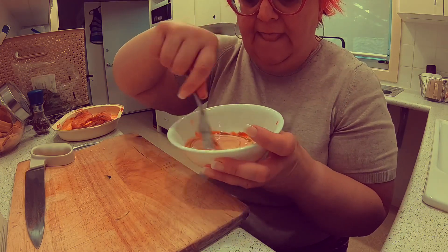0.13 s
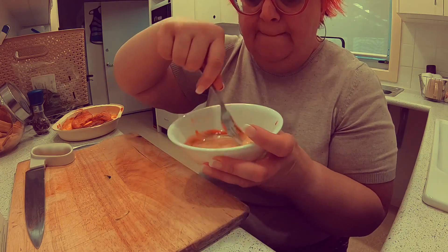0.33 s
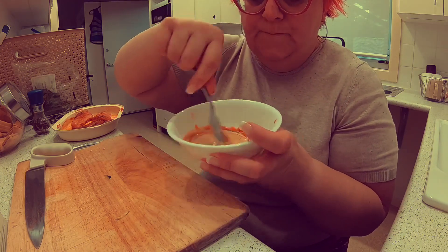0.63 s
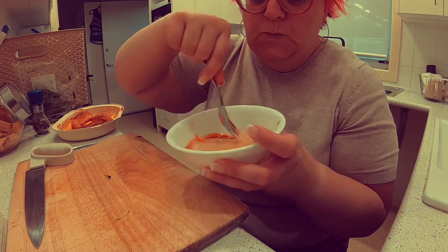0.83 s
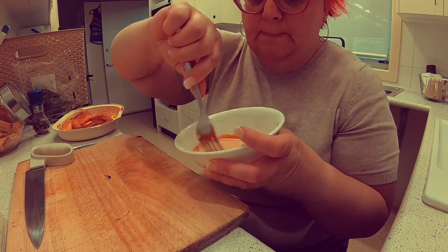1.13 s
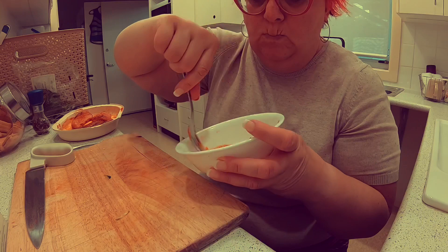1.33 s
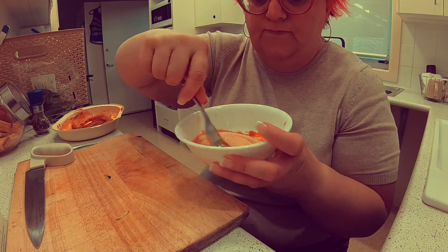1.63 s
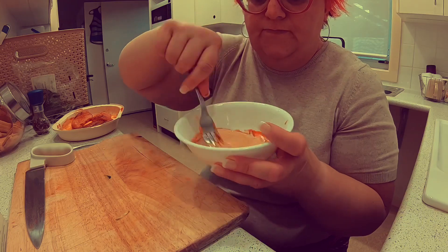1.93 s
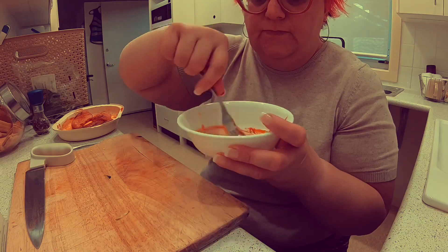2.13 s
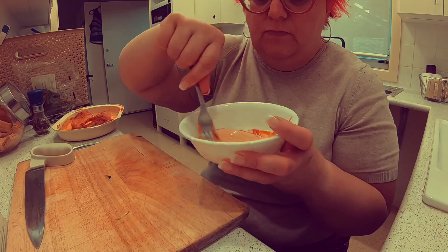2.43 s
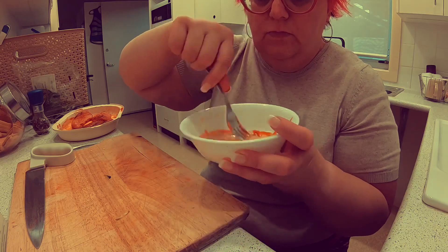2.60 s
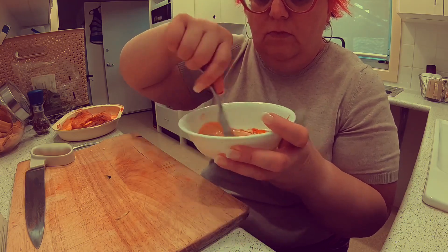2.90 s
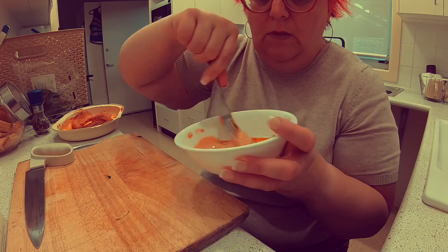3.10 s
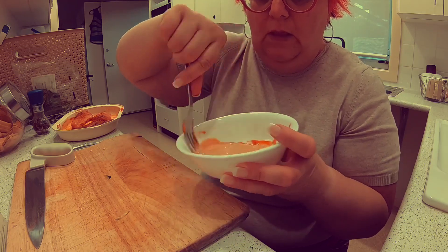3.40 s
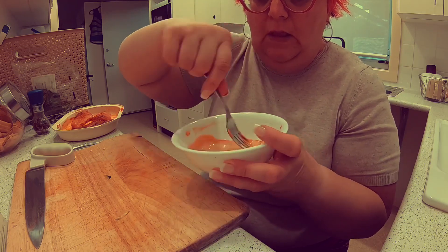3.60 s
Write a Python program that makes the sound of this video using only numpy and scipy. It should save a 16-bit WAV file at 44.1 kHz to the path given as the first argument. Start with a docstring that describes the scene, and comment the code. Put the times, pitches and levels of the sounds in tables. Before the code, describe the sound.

A metal fork stirs thick sauce in a ceramic bowl, opening with quick clinks and gritty squeaks, then sparser hard taps between short scrapes and soft squelches; close microphone, small kitchen, faint low hum.

```python
"""Stirring thick sauce in a ceramic bowl

A metal fork clinks on a hand-held bowl in a small kitchen: damped modes plus a crack of noise.
Its tines squeak by stick-slip over the glaze, and light rubbing runs on as filtered random grains.
The sauce squelches: random pops ring its hollows and rising sine blips gurgle.
Ceramic resonances and brief room reverberation follow the contacts, over a low hum of shaped noise."""
import sys
import numpy as np
from scipy import signal
from scipy.fft import rfft, irfft
from scipy.io import wavfile
from scipy.ndimage import uniform_filter1d, minimum_filter1d

SR = 44100
rng = np.random.default_rng(int(sys.argv[2]) if len(sys.argv) > 2 else 0)


def master_out(mix):
    """Clip the mix to full scale and print it as 16-bit PCM to the path in sys.argv[1]."""
    frames = np.transpose(np.atleast_2d(mix))
    ceiling = np.clip(frames, -1, 1)
    pcm = np.round(ceiling * 32767).astype(np.int16)
    wavfile.write(sys.argv[1], SR, pcm)


N = 165375

# Steady background: f/Hz, spectral level/dB per Hz (relative)
HUM_SPECTRUM = [(25, -11), (48, -3.5), (90, -10), (160, 4), (235, 1), (350, -10.5), (700, -10.5),
                (1300, -15.5), (3000, -23), (8000, -27), (15000, -46)]
HUM_DB, HUM_SIDE_DB = -51.5, -24.5   # side relative to mid

# Light continuous rubbing, pressure of the fork on the bottom: t/s, level/dB
DRAG_PRESSURE = [(0, -46), (.4, -52), (.9, -50), (1.121, -61), (1.21, -58), (1.3, -56), (1.42, -51),
                 (1.78, -55), (2.35, -55), (2.75, -52), (3.199, -48), (3.45, -59), (3.7, -47)]
# Colour of the rubbing: f/Hz, spectral level/dB per Hz (relative)
DRAG_SPECTRUM = [(300, -2), (1000, -4), (1900, 14), (2700, -19), (4200, 11.5), (7000, -2), (9000, -40),
                 (15000, -12.5)]
DRAG_SWING_DB, DRAG_SWING_HZ = 4, 4.8   # spread and bandwidth of the overall wavering
DRAG_BANDS_HZ = [200, 1400, 2300, 3600, 4500, 5600, 7600, 16000]
DRAG_FLICKER_DB, DRAG_FLICKER_HZ = 1, 10.8   # the same for each band on its own

# Tines dragging over the glaze: t/s, length/s, squeak level/dB, grit level/dB, f/Hz of the lowest
# tone, extra treble level/dB; a negative t starts at zero
SCRAPE_EVENTS = [(-.01, 0.048, -49, -35.5, 1696, -7), (0.162, 0.0093, -28, -29, 1720, 4),
                 (0.296, 0.011, -45, -61, 1910, 0), (0.35, 0.015, -43.5, -67, 1795, -1),
                 (0.41, 0.024, -34, -36.5, 1605, -39), (0.426, 0.019, -24, -19, 1684, 2.5),
                 (0.452, 0.035, -37, -32.5, 1665, -9), (0.673, 0.018, -23, -15.5, 1610, 7),
                 (0.682, 0.015, -27, -14.5, 1575, 4), (0.708, 0.024, -29, -21.5, 1554, -2),
                 (0.744, 0.027, -52, -36, 1610, -12), (0.969, 0.02, -52, -33, 1683, 14),
                 (1.452, 0.036, -36, -25, 1646, 0.5), (1.489, 0.02, -24, -27, 1651, -5.5),
                 (1.638, 0.017, -44, -43, 1690, 3), (1.809, 0.032, -74, -43, 1723, 3),
                 (1.905, 0.021, -29, -27, 1710, 3), (1.927, 0.024, -21, -21, 1720, 2.5),
                 (1.976, 0.062, -41.5, -37, 1687, -19), (2.189, 0.0038, -33, -29.5, 1700, -28),
                 (2.213, 0.008, -33, -36, 1751, 2), (2.435, 0.018, -19.5, -35, 1732, -2),
                 (2.451, 0.015, -17.5, -22, 1735, 4), (2.331, 0.021, -57.5, -45.5, 1680, 7),
                 (2.579, 0.026, -67, -41, 1653, -4), (2.701, 0.0073, -36.5, -51, 1818, 4.5),
                 (2.95, 0.013, -21, -19.5, 1723, 7), (2.991, 0.034, -37, -43.5, 1697, -11),
                 (3.262, 0.026, -33.5, -47, 1543, -29), (3.294, 0.007, -24, -21.5, 1651, -4),
                 (3.31, 0.032, -36, -38.5, 1636, -15), (3.673, 0.0016, -35.5, -57, 1720, -12),
                 (3.69, 0.0078, -37, -42.5, 1720, 5), (3.74, .02, -39, -46, 1720, 17)]
# Second to ninth partials of the stick-slip tone: level/dB against the lowest tone, before judder
OVERTONE_LEVELS = [-13, -6.5, -2.5, -13, -24.5, -13.5, -1, -5.5]
# Resonances stirred by rubbing: f/Hz at the rest pitch, width/Hz of one pass, level/dB per Hz of width
RUB_RESONANCES = [(1450, 50, -29), (1720, 140, 3), (1907, 43, 5.5), (3260, 380, -14), (4470, 2200, -13),
                  (4985, 356, 4), (5920, 1020, -6.5), (6374, 296, 7.5), (6570, 62, 6), (7300, 800, -33),
                  (9730, 740, -17), (12550, 210, -2.5), (14000, 930, -12), (16300, 406, -6.5)]
SCRAPE_ATTACK_S, SCRAPE_RELEASE_S, GRAINS_PER_S = 0.0039, 0.0077, 3500
PITCH_WOBBLE, WOBBLE_HZ, JUDDER_DB = 0.0094, 245, 2.5   # wobble: share of the pitch
OVERTONE_TUNE = 0.98   # partials above the second lie slightly flat
PING_FOLLOWS = 0.54   # the cleaner the squeak, the stronger its octave (dB per dB of squeak over grit)
SWELL_SHARE = 0.4   # share of a scrape over which overtones and grit build up
GRIT_REST_HZ, GRIT_FOLLOWS = 1667.5, 0.58   # rubbed resonances rise with the tine pitch (exponent)

# Impacts of fork on bowl: t/s, level/dB, extra bass/dB, extra ting/dB, extra clank/dB, extra treble/dB
CLINK_EVENTS = [(0.0501, -11, 2.5, 7.5, 8.5, -4.5), (.168, -17.5, -8, -11, 0.5, -4.5),
                (.401, -38, 14.5, -6, 0, -6), (.432, -18, 2.5, 1, -14, 4),
                (0.5911, -5.5, 0.5, 0.5, 2, -4.5), (.596, -8, -6.5, 9, 1, -7.5), (.697, -14, -4.5, 3, 9, 6),
                (.909, -33.5, 7.5, -6, -2, -9), (0.977, -21.5, 6, 16.5, -12, 2.5),
                (1.13, -48, 12, 10, 4, 9), (1.467, -26.5, 0.5, 16, -4, 2), (1.502, -27, 2, 10, 2, 5),
                (1.647, -38, 18, 10, -2, -5), (1.707, -36.5, 8, -12, 5, 3), (1.84, -31, 3.5, 0, -5, -6),
                (1.912, -27, -14, 8, -2, -1), (2.072, -13.5, -1, 12, 15, -9),
                (2.076, -2.5, -3, -2, 7.5, -3), (2.116, -21, -5, 3, 7, -10), (2.378, -42, 7, 1, 4, 4),
                (2.8189, -2.5, -4.5, -1.5, 6, -1.5), (2.8232, -10.5, 1, -5, -9, -2),
                (3.079, -14.5, -3, 4.5, -1, -12), (3.0912, -9, -1, 0.5, 8.5, -5),
                (3.3, -22.5, 6.5, 13.5, -14, -1), (3.494, -18, -2.5, -10, -2.5, -6.5),
                (3.631, -41, 27.5, 11, -17, -4), (3.709, -30, 10, -2, -19, -7),
                (3.737, -29.5, 2.5, 0, -2, 4.5)]
# Modes of fork and bowl: f/Hz, level/dB (relative), t60/s
RING_MODES = [(1938, -12, 0.072), (2227, -16.5, 0.023), (3310, -10, 0.023), (4890, -16, 0.02),
              (4985, -9, 0.051), (5150, -2.5, 0.025), (5480, -10, 0.022), (5710, 0, 0.027),
              (6380, -6, 0.024), (6580, -9, 0.013), (6810, -7.5, 0.016), (9530, -11.5, 0.014),
              (12014, -1.5, 0.015), (13900, -18, 0.015), (15300, -15, 0.014)]
# Noise of first contact: f/Hz, spectral level/dB per Hz (relative)
CRACK_SPECTRUM = [(40, -60), (150, -42.5), (550, -10.5), (1100, -14.5), (2100, -1), (2800, -9.5),
                  (3300, -6.5), (3750, -12), (4650, 0.5), (5600, -1), (7000, -2.5), (8400, -21),
                  (11000, -39), (12100, -0.5), (12900, -8.5), (15500, -14)]
CRACK_DB, CRACK_T60_S, RING_DB, MODE_SPREAD_DB, CLINK_ATTACK_S = 0.5, 0.036, -3.5, 1, 0.0015
# The place of contact favours one group of modes or the other; widths as shares of the pitch
TING_HZ, TING_WIDTH, CLANK_HZ, CLANK_WIDTH = 4873, 0.082, 6720, 0.098
CHATTER_PER_S, CHATTER_DECAY_S, CHATTER_DB = 580, 0.008, -11.5   # tines rebounding after a hit

# Lingering ceramic resonances: f/Hz, width/Hz, level/dB
BOWL_RESONANCES = [(1056, 12, -0.5), (1460, 4, -9), (1760, 5.9, -6), (1916, 45, -1), (4960, 42, -5),
                   (5970, 22, -2), (6470, 11, -19.5), (6470, 18, 8)]

# Pushes through the sauce: t/s, length/s, level/dB, extra low plop/dB, extra wet smack/dB
SQUELCH_EVENTS = [(0.056, 0.052, -44.5, -19, 0), (0.095, 0.041, -37, 12, -6), (0.162, 0.052, -49.5, 0, 24),
                  (0.336, 0.031, -42.5, -10, -1), (0.393, 0.012, -31.5, 6, -12),
                  (0.432, 0.039, -49.5, 13, 12), (0.614, 0.054, -40, 11, 12), (0.675, 0.047, -40.5, -1, 24),
                  (0.88, 0.016, -36.5, -4, 1), (0.907, 0.025, -34, 0, -2), (0.974, 0.042, -35.5, 2, 4),
                  (1.494, 0.024, -39.5, 13, 1), (1.52, 0.021, -34.5, 5, 2), (1.636, 0.035, -39.5, 9, 9),
                  (1.921, 0.035, -50, 12, 11), (2.081, 0.01, -39, -1, -18), (2.108, 0.068, -43, -4, 7.5),
                  (2.379, 0.023, -46, -9, 9), (2.82, 0.063, -46.5, -12, -3), (3.091, 0.02, -38, 14, -11),
                  (3.167, 0.038, -42, 3, -13), (3.2, 0.02, -35.5, 17, -8), (3.301, 0.022, -42, 5, 1),
                  (3.547, 0.11, -49, -4, 0), (3.625, 0.013, -29.5, -1, -6), (3.655, 0.036, -44, 23, -3)]
# Hollows in sauce and bowl: f/Hz, width/Hz, level/dB per Hz of width (relative)
HOLLOW_RESONANCES = [(100.5, 86, -13.5), (158.3, 41, -2.5), (232.7, 19.7, 5), (500, 45, -1),
                     (635.3, 26.6, 6), (803.7, 14.6, 6), (895, 71, -6.5), (1061.4, 20, 4), (1390, 210, -31),
                     (3020, 1490, -18)]
PLOP_BELOW_HZ, SMACK_ABOVE_HZ, SAUCE_DULL_HZ = 320, 860, 3800
POPS_PER_S, POPS_FADE = 420, 1.8   # fade: decay time in stroke lengths
HOLLOW_DB, BUBBLE_DB = 3, -7   # balance within one squelch
BUBBLE_LOW_HZ, BUBBLE_HIGH_HZ, BUBBLES_PER_S = 453.4, 1570, 220
BUBBLE_CYCLES, BUBBLE_RISE = 3.8, .05   # cycles of starting pitch, and share of it gained, per decay time

# Reverberation time: f/Hz, t60/s
ROOM_DECAY = [(150, 0.064), (700, 0.22), (1800, 0.33), (5500, 0.33), (13000, 0.34)]
# Reverberant level: f/Hz, level/dB against the direct sound
ROOM_LEVEL = [(150, -9), (700, -5.5), (1800, -6.5), (5500, -5.5), (13000, -5)]
ROOM_DELAY_S = 0.0056

WIDE_ABOVE_HZ, LEFT_TREBLE_DB, RIGHT_TREBLE_DB, LEFT_LAG_S = 11240, 1, 3.5, .00002
LIMIT_DB, LIMITER_S, CEILING = 1.5, 0.00064, 0.83   # threshold re full scale, window, amplitude
STOPBAND_HZ = 16400


def from_db(db):
    """Logarithmic level: decibels to amplitude gain."""
    return 10 ** (np.asarray(db) / 20)


def rms_one(x):
    """Normalisation: scale to unit mean power."""
    return x / np.sqrt(np.mean(x ** 2) + 1e-20)


def at_hz(points, hz):
    """Interpolation along a logarithmic frequency axis."""
    f, v = np.transpose(points)
    return np.interp(np.log(np.maximum(hz, 1)), np.log(f), v)


def butter(x, hz, kind, order=2):
    """Maximally flat (Butterworth) filtering."""
    sos = signal.butter(order, hz, kind, fs=SR, output="sos")
    return signal.sosfilt(sos, x + 1e-18)


def colour(x, spectrum):
    """Spectral shaping: weight a noise over frequency, then set unit power."""
    hz = np.arange(len(x) // 2 + 1) * SR / len(x)
    return rms_one(irfft(rfft(x) * from_db(at_hz(spectrum, hz)), len(x)))


def drift(bandwidth_hz, size):
    """Band-limited random motion: low-passed noise of unit spread."""
    noise = rng.standard_normal(size + SR // 2)   # the extra half second lets the filter settle
    return rms_one(butter(noise, bandwidth_hz, "low")[-size:])


def grains(per_s, size):
    """Random point process: clicks of uneven strength and sign."""
    return (rng.random(size) < per_s / SR) * rng.standard_normal(size)


def resonate(x, hz, width):
    """Two-pole resonance with about unit gain at its peak."""
    r = np.exp(-np.pi * width / SR)
    zeros = np.array([1, 0, -1]) * (1 - r * r) / 2
    poles = [1, -2 * r * np.cos(2 * np.pi * hz / SR), r * r]
    return signal.lfilter(zeros, poles, x + 1e-18)


def stroke(t, length):
    """Pressure envelope of one push: attack, hold, exponential release."""
    attack = np.minimum(t / SCRAPE_ATTACK_S, 1) ** 2
    return attack * np.exp(-np.maximum(t - length, 0) / SCRAPE_RELEASE_S)


def as_strong_as(x, envelope):
    """Energy matching: give a burst the energy of its envelope."""
    return rms_one(x) * np.sqrt(np.mean(envelope ** 2))


def tilt(hz, bass_db, treble_db):
    """Spectral tilt of one contact: level in dB at a frequency."""
    return at_hz([(2000, bass_db), (4500, 0), (7500, 0), (11500, treble_db)], hz)


def add(track, s, sound):
    """Superposition: mix a sound in at its time."""
    i = int(max(s, 0) * SR)
    track[i:i + len(sound)] += sound[:len(track) - i]


def hum():
    """Stationary noise: a low room background, almost equal in both ears."""
    mid = colour(rng.standard_normal(N), HUM_SPECTRUM)
    side = colour(rng.standard_normal(N), HUM_SPECTRUM)
    return from_db(HUM_DB) * (mid + from_db(HUM_SIDE_DB) * side * np.array([[1], [-1]]))


def drag():
    """Sliding friction: many tiny random contacts along the wet bottom, their colour wavering."""
    rub = colour(grains(GRAINS_PER_S, N), DRAG_SPECTRUM)
    shifting = np.zeros(N)
    for low, high in zip(DRAG_BANDS_HZ, DRAG_BANDS_HZ[1:]):
        flicker = from_db(DRAG_FLICKER_DB * drift(DRAG_FLICKER_HZ, N))
        shifting += butter(rub, [low, high], "band") * flicker
    level_db = np.interp(np.arange(N) / SR, *np.transpose(DRAG_PRESSURE))
    return rms_one(shifting) * from_db(level_db + DRAG_SWING_DB * drift(DRAG_SWING_HZ, N))


def scrapes():
    """Stick-slip: a tine's lowest tone swells evenly, overtones judder, grit rattles resonances."""
    out, t = np.zeros(N), np.arange(SR // 8) / SR
    for s, length, squeak_db, grit_db, hz, treble_db in SCRAPE_EVENTS:
        push = stroke(t, length)
        bite = push * np.minimum(t / (SWELL_SHARE * length), 1)
        judder = from_db(JUDDER_DB * (drift(WOBBLE_HZ, len(t)) - 2.0))
        pitch = hz * (1 + PITCH_WOBBLE * drift(WOBBLE_HZ, len(t)))
        phase = 2 * np.pi * np.cumsum(pitch) / SR
        flat_phase = phase + 2 * np.pi * hz * t * (OVERTONE_TUNE - 1)

        overtones = 0
        for k, db in enumerate(OVERTONE_LEVELS, 2):
            octave_db = PING_FOLLOWS * (squeak_db - grit_db) if k == 2 else 0
            gain = from_db(db + tilt(k * hz, 0, treble_db) + octave_db)
            base = flat_phase if k > 2 else phase
            overtones = overtones + gain * np.sin(k * base + 2 * np.pi * rng.random())
        squeak = push * (np.sin(phase) + overtones * judder * bite)

        slips = grains(GRAINS_PER_S, len(t)) * bite * judder
        rise = (hz / GRIT_REST_HZ) ** GRIT_FOLLOWS
        grit = 0
        for f, width, db in RUB_RESONANCES:
            rattle = resonate(resonate(slips, f * rise, width), f * rise, width)
            grit = grit + from_db(db + tilt(f, 0, treble_db)) * np.sqrt(width) * rms_one(rattle)

        add(out, s, from_db(squeak_db) * as_strong_as(squeak, push)
            + from_db(grit_db) * as_strong_as(grit, push))
    return out


def clinks():
    """Impact excitation: a brief crack and quickly damped modes, roughened by rebounding tines."""
    out, t = np.zeros(N), np.arange(SR // 5) / SR
    hz, mode_db, t60 = np.transpose(RING_MODES)
    modes = np.sin(2 * np.pi * np.outer(hz, t)) * from_db(-60 * t / t60[:, None])
    grid = np.geomspace(40, 16000, 300)   # Hz
    ting = np.exp(-(np.log(grid / TING_HZ) / TING_WIDTH) ** 2)
    clank = np.exp(-(np.log(grid / CLANK_HZ) / CLANK_WIDTH) ** 2)
    for s, db, bass_db, ting_db, clank_db, treble_db in CLINK_EVENTS:
        tone = tilt(grid, bass_db, treble_db) + ting_db * ting + clank_db * clank

        spread_db = MODE_SPREAD_DB * rng.standard_normal(len(hz))
        gains = from_db(RING_DB + mode_db + np.interp(hz, grid, tone) + spread_db)
        ring = (gains * rng.choice([-1, 1], len(hz))) @ modes
        rebounds = grains(CHATTER_PER_S, len(t)) * from_db(CHATTER_DB) * np.exp(-t / CHATTER_DECAY_S)
        ring = ring + signal.fftconvolve(ring, rebounds)[:len(t)]

        noise = rfft(colour(rng.standard_normal(len(t)), CRACK_SPECTRUM))
        noise_hz = np.arange(len(noise)) * SR / len(t)
        crack = irfft(noise * from_db(np.interp(noise_hz, grid, tone)), len(t))
        crack = crack * from_db(CRACK_DB - 60 * t / CRACK_T60_S)

        attack = np.minimum(t / CLINK_ATTACK_S, 1)
        add(out, s, from_db(db) * attack * (ring + crack))
    return out


def singing(x):
    """Sympathetic resonance: contacts plus the lingering tones they wake in the ceramic."""
    return x + sum(from_db(db) * resonate(x, hz, width) for hz, width, db in BOWL_RESONANCES)


def gurgle(t, length, count=30):
    """Bubble oscillation: bubbles of many sizes burst in turn, each a short rising, decaying sine."""
    wait, size, strength = rng.random((3, count))
    starts = np.cumsum(2 * wait) / BUBBLES_PER_S
    hz = BUBBLE_LOW_HZ * (BUBBLE_HIGH_HZ / BUBBLE_LOW_HZ) ** size
    age = np.maximum(t - starts[:, None], 0) * hz[:, None] / BUBBLE_CYCLES   # in decay times
    cycles = BUBBLE_CYCLES * age * (1 + BUBBLE_RISE * age / 2)
    blips = np.sin(2 * np.pi * cycles) * np.exp(-age)
    return (strength * stroke(starts, length)) @ blips


def sauce():
    """Cavity resonance: air pockets open softly behind the fork, gurgle and ring the hollows."""
    out, t = np.zeros(N), np.arange(SR // 6) / SR
    for s, length, db, plop_db, smack_db in SQUELCH_EVENTS:
        push = stroke(t, length)
        pops = grains(POPS_PER_S, len(t)) * push * np.exp(-t / (length * POPS_FADE))
        wet = 0
        for k, (f, width, hollow_db) in enumerate(HOLLOW_RESONANCES):
            extra_db = plop_db * (f < PLOP_BELOW_HZ) + smack_db * (f > SMACK_ABOVE_HZ)
            gain = (-1) ** k * from_db(hollow_db + extra_db) * np.sqrt(width)   # alternating sign
            wet = wet + gain * rms_one(resonate(pops, f, width))
        hollows = from_db(HOLLOW_DB) * rms_one(butter(wet, SAUCE_DULL_HZ, "low"))
        slosh = hollows + from_db(BUBBLE_DB) * rms_one(gurgle(t, length))
        add(out, s, from_db(db) * as_strong_as(slosh, push))
    return out


def kitchen(x):
    """Diffuse reverberation: dense, evenly coloured reflections die away band by band."""
    t = np.arange(SR // 2) / SR
    edges = np.geomspace(80, 19000, 10)   # Hz
    echo = 0
    for low, high in zip(edges, edges[1:]):
        hz = np.sqrt(low * high)
        fade = from_db(-60 * t / at_hz(ROOM_DECAY, hz))
        tail = rng.standard_normal(len(t)) * fade
        for _ in range(4):   # alternately flatten the spectrum and smooth the decay
            tail = irfft(np.exp(1j * np.angle(rfft(tail))), len(t))
            tail = tail * fade / np.sqrt(uniform_filter1d(tail ** 2, size=400) + 1e-18)
        band = butter(tail * (t > ROOM_DELAY_S), [low, high], "band")
        share = np.sqrt(2 * (high - low) / SR / len(t))   # amplitude due to the band's width
        echo = echo + from_db(at_hz(ROOM_LEVEL, hz)) * rms_one(band) * share
    return signal.fftconvolve(x, echo)[:N]


def scene():
    """Stereo imaging: the bowl sits in the centre; only its highest treble spreads, leaning right."""
    bowl = singing(clinks() + scrapes() + drag()) + sauce()
    centre = butter(bowl + kitchen(bowl), WIDE_ABOVE_HZ, "low", order=8)
    top = butter(bowl, WIDE_ABOVE_HZ, "high", order=8)
    t = np.arange(N) / SR
    late_top = np.interp(t - LEFT_LAG_S, t, top)
    left = from_db(LEFT_TREBLE_DB) * late_top + kitchen(top)
    right = from_db(RIGHT_TREBLE_DB) * top + kitchen(top)
    return centre + np.array([left, right]) + hum()


def record(dry):
    """Peak limiting: fast gain ducks the loudest peaks, saturation rounds the rest, the top is cut."""
    size = max(int(LIMITER_S * SR), 2)
    gain = np.minimum(1, from_db(LIMIT_DB) / (np.abs(dry).max(axis=0) + 1e-9))
    held = dry * uniform_filter1d(minimum_filter1d(gain, size), size)
    rounded = held / (1 + (held / CEILING) ** 8) ** (1 / 8)
    low_pass = signal.cheby2(16, 60, STOPBAND_HZ, fs=SR, output="sos")
    return signal.sosfilt(low_pass, rounded)


dry = scene()
out = record(dry)
master_out(out)
```